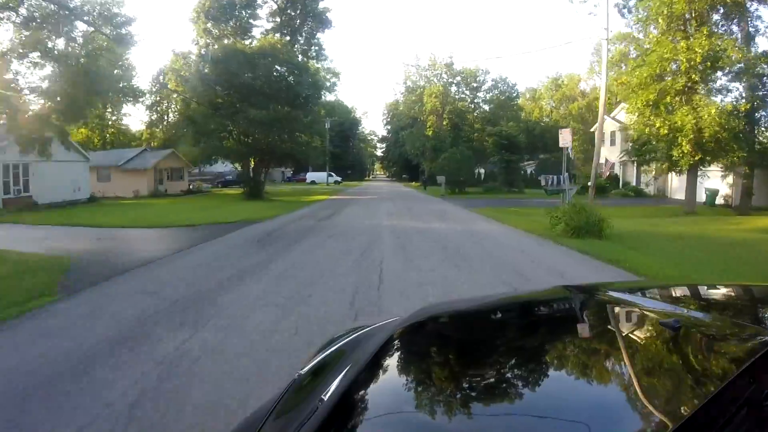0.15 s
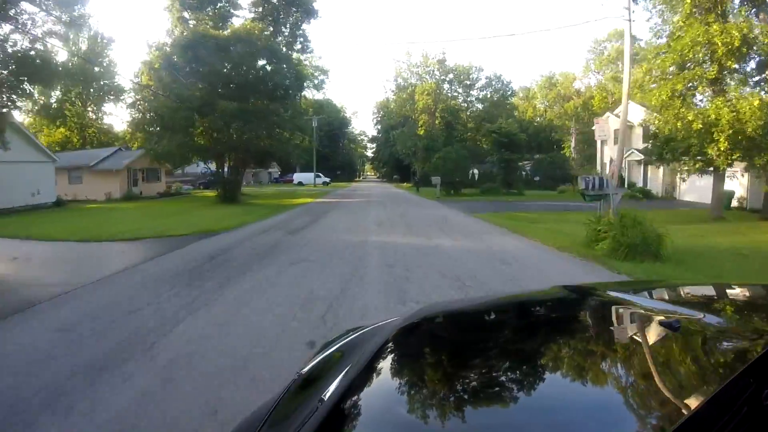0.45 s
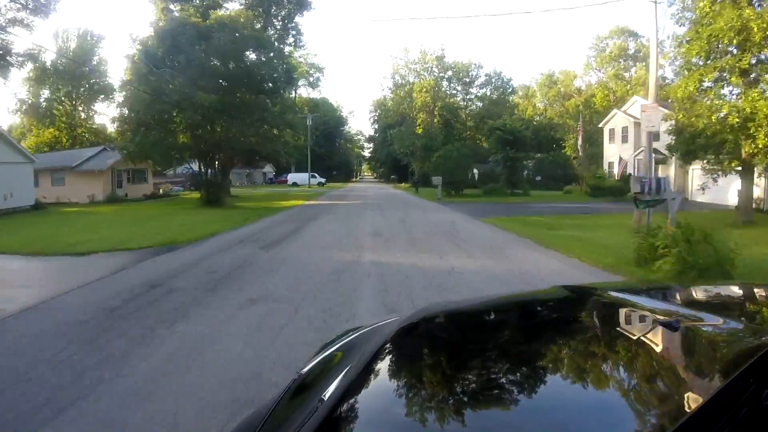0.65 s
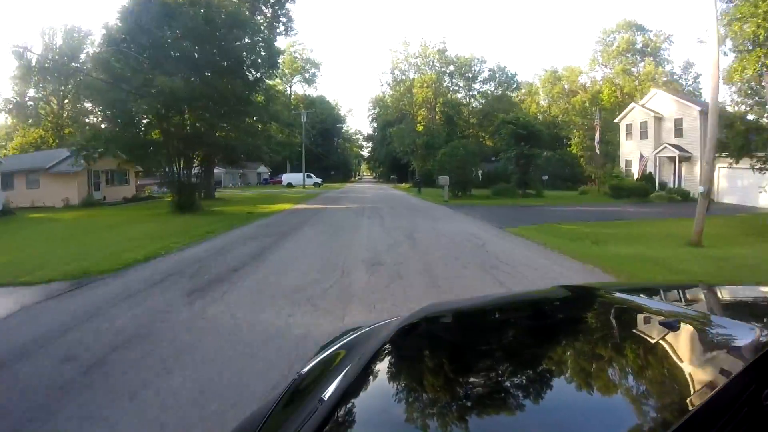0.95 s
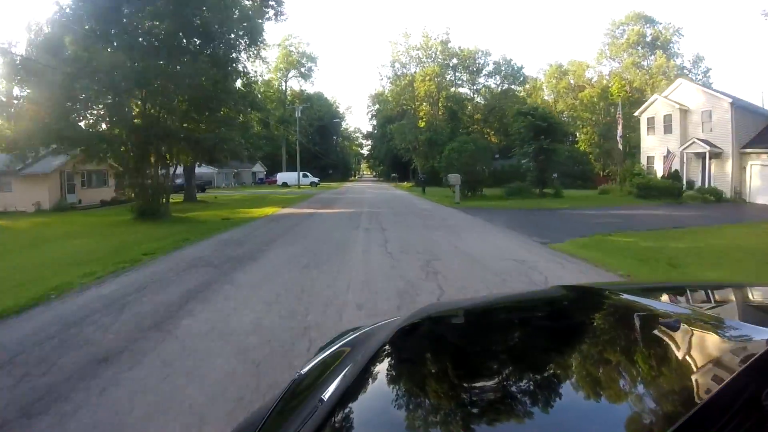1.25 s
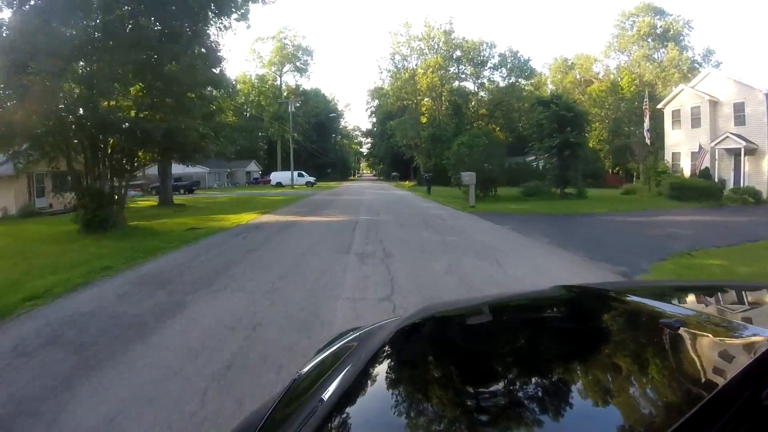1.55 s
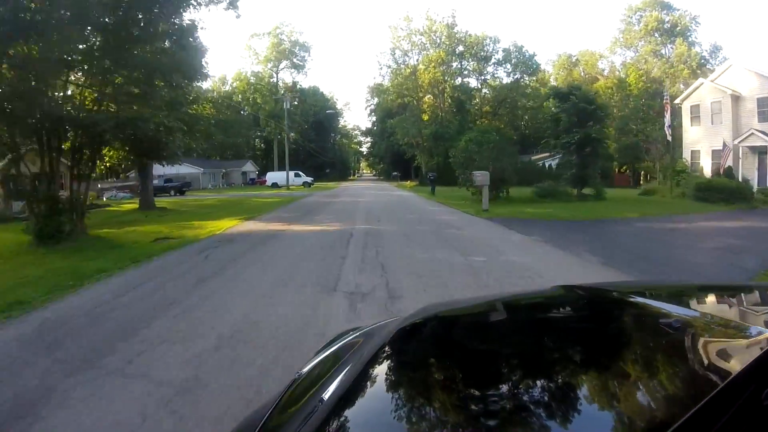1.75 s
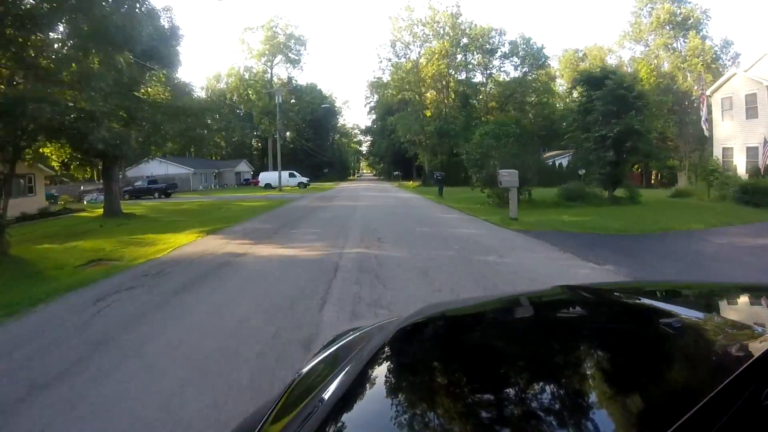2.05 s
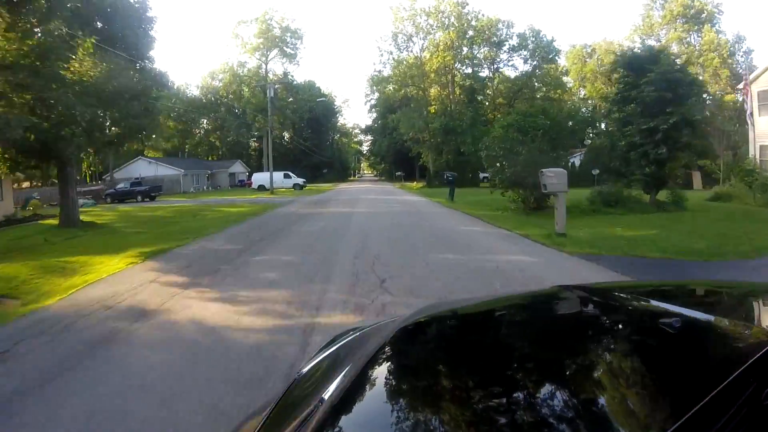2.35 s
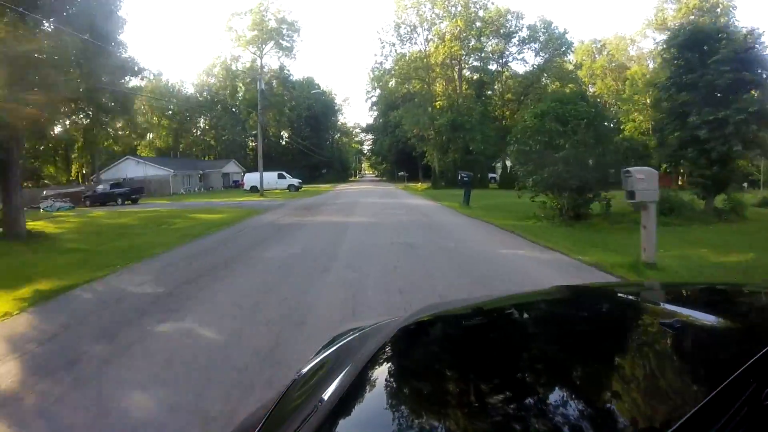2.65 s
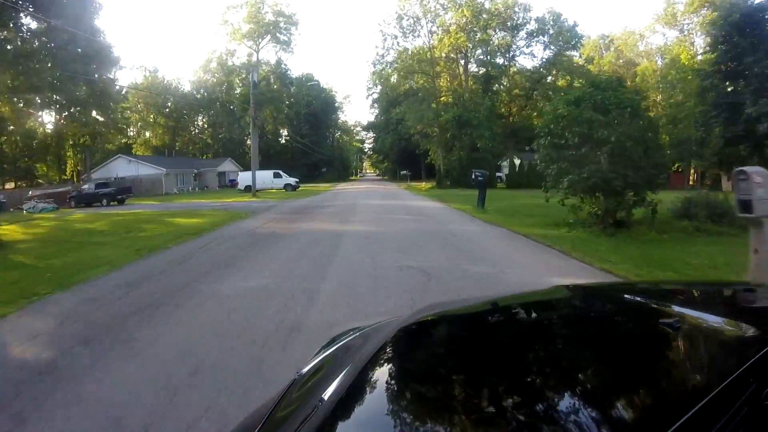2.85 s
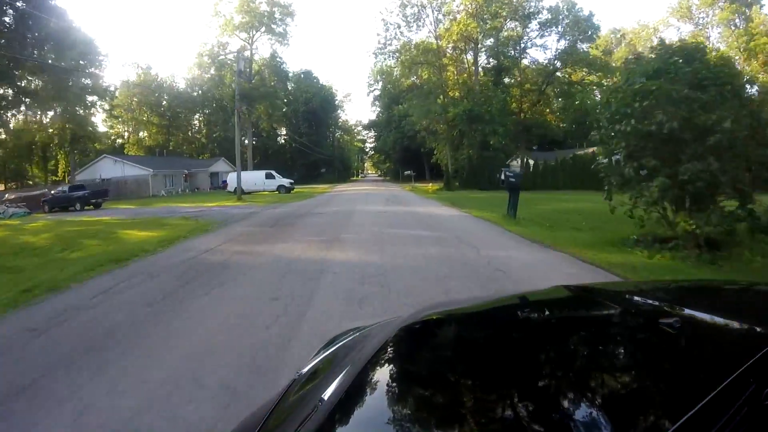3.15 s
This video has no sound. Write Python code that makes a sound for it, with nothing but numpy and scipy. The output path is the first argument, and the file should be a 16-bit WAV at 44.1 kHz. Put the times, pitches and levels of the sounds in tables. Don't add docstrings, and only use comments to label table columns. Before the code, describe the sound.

A car engine roars under hard acceleration, cuts with a valve flutter, then drives on quieter.

```python
import sys
import numpy as np
from scipy import signal
from scipy.fft import rfft, irfft
from scipy.io import wavfile
from scipy.ndimage import uniform_filter1d

SR = 44100
rng = np.random.default_rng(int(sys.argv[2]) if len(sys.argv) > 2 else 0)


def convert_level_to_amplitude(level_db):
    exponent = np.asarray(level_db, float) / 20
    return 10 ** exponent


def inscribe(sig):
    pcm = np.round(np.clip(np.atleast_2d(sig).T, -1, 1) * 32767)
    wavfile.write(sys.argv[1], SR, pcm.astype(np.int16))


N = 145089

# (time [s], firing rate [Hz], firing level [dB], intake roar [dB])
ENGINE_RUN = [(0, 77.7, -18, -41.5), (.1, 80.2, -17, -32), (.26, 84.9, -17, -24), (.45, 90.6, -16, -21),
              (.74, 98.4, -18, -18.5), (1.13, 104.5, -22, -19), (1.2, 105, -30, -23.5),
              (1.34, 105, -30, -26), (1.46, 104.5, -21, -32.5), (2.15, 105, -18, -32.5),
              (2.42, 101.1, -23, -38), (2.52, 93, -21, -37.5), (2.62, 79, -18, -38), (2.76, 69, -15.5, -39),
              (2.9, 63.8, -15.5, -40), (3.05, 68.35, -24, -39.5), (3.17, 64.27, -21, -48),
              (3.29, 66.9, -16, -41.5)]
# (time [s], state [1])
DRIVE_STATE = [(.15, 0), (.45, 1), (.75, 1.25), (1.12, 1.3), (1.2, 2), (1.34, 2), (1.42, 3), (2.6, 3),
               (2.78, 3.3), (2.92, 3.3), (3.03, 4), (3.14, 4), (3.175, 3.6), (3.21, 3.95), (3.29, 3.85)]
# (multiple of firing rate [1], level in states 0 to 4 [dB] x 5)
FIRING_ORDERS = [(.5, -20, -18, -10, -15, -12), (1, 0, 0, 0, 0, 0), (1.5, -20, -16, -10, -16, -12),
                 (2, -1, -8, -5, -13, 11), (3, -15, -9, -2, -26, 1), (4, -14, -10, -24, -26, -20),
                 (4.5, -15, -20, -14, -28, -20), (5, -20, -20, -14, -34, -4)]
# (frequency [Hz], width [Hz], level [dB])
INTAKE_PEAKS = [(433.7, 49, -1), (686, 43.7, 0.5), (1033.4, 33, -6), (1157, 35, -4.5), (1256, 34.5, -1),
                (1491, 29.4, -1), (1655, 36, 0.5), (1752, 167, -1), (1977, 205, -1), (2078.5, 54, 2.5),
                (2230, 50, -16), (2624, 80, -21.5)]
# (frequency [Hz], density [dB/Hz])
ROAD_COLOUR = [(12, -24.5), (22, -19), (109, -2), (269, -11.5), (690, -20), (890, -31.5), (2000, -36.5),
               (3500, -44.5)]
# (time [s], level [dB])
ROAD_COURSE = [(0, -27), (.5, -24), (.9, -21), (1.17, -20), (1.25, -23), (1.33, -29), (1.42, -25.5),
               (1.6, -23), (2.2, -20), (2.6, -21.5), (3.0, -22), (3.29, -25)]
# (time [s], level [dB])
TURBO_AIR = [(0, -41.5), (.08, -39.5), (.3, -36), (.65, -31.5), (1.14, -32.5), (1.19, -37), (1.234, -41.5),
             (1.295, -38), (1.33, -43.5), (1.37, -38), (1.4, -43), (1.415, -39.5), (1.55, -40), (2.1, -39),
             (2.45, -45), (3.04, -47.5), (3.07, -54), (3.12, -48.5)]
# (frequency [Hz], density [dB/Hz])
HISS_COLOUR = [(1500, -14.5), (2300, 1.5), (3000, -13), (5300, -12), (7000, -19), (9000, -26), (10300, -32),
               (15000, -47.5)]
# (frequency [Hz], width [Hz], level [dB])
DUCT_PEAKS = [(3158, 23, 2.5), (3398, 45, 3), (3706, 16, 5), (4066, 84, 0.5), (4505, 75, -1.5),
              (5140, 140, -12), (5980, 33, -4), (6515, 120, -6), (8550, 260, -8), (9380, 120, -39)]
# (time [s], frequency [Hz], level [dB])
AIR_RUSH = [(0, 4300, -62), (.08, 4600, -51), (.2, 5200, -47), (.6, 5220, -44), (1.15, 5230, -46),
            (1.25, 5230, -52), (1.55, 5240, -50), (1.7, 5200, -65)]
# (time [s], frequency [Hz], level [dB])
SPOOL_UP = [(.12, 1470, -50), (.17, 1490, -36), (.25, 1470, -34), (.3, 1480, -24), (.335, 1490, -34),
            (.365, 1580, -29), (.39, 1680, -24), (.43, 1980, -25), (.47, 2070, -30), (.52, 2090, -70)]
# (time [s], frequency [Hz], level [dB])
WHEEL_WHISTLE = [(.35, 7900, -75), (.5, 8250, -55), (.65, 8700, -52), (.8, 8930, -50), (.95, 8780, -51),
                 (1.1, 8400, -51), (1.205, 8100, -51), (1.22, 8050, -75)]
# (centre time [s], peak [dB], pitch [Hz], half length [s])
DUCT_TONES = [
    (.385, -27, 1680, 0.042),
    (.44, -21.5, 1470, 0.018),
    (0.58, -28, 1240, 0.036),
    (0.51, -23, 1485, 0.09),
    (0.64, -23, 2085, 0.067),
    (0.82, -18.5, 2050, 0.014),
    (.625, -24, 1760, 0.033),
    (2.76, -41, 3200, 0.033),
]
# (centre time [s], peak [dB], pitch [Hz], half length [s])
VALVE_FLUTTER = [(.83, -17, 366, 0.025), (.895, -16.5, 447, 0.032), (1.045, -19.5, 365, 0.039),
                 (.922, -10, 429, 0.029), (.99, -17, 354, 0.04), (1.058, -19, 423, .01),
                 (1.06, -22, 696, 0.022), (1.088, -11, 433, 0.028), (1.115, -13.5, 427, 0.017),
                 (1.12, -24, 700, 0.021), (.965, -15.5, 410, 0.02), (1.385, -25.5, 677, .025),
                 (1.45, -28.5, 698, 0.035), (1.15, -7.5, 400, 0.0088), (1.189, -6.5, 439, 0.022),
                 (1.214, -2.5, 431, 0.02), (1.252, -14, 440, 0.028), (1.274, -11, 487, 0.0082),
                 (1.29, -8, 410, 0.0079), (1.304, -3.5, 435, 0.0048), (1.319, -11.5, 436, 0.016),
                 (1.365, -13, 425, 0.0076), (1.403, -9.5, 422, 0.012), (1.423, -17.5, 446, 0.022)]
# (centre time [s], peak [dB], pitch [Hz], half length [s])
BODY_BUMPS = [(.865, -8.5, 80, 0.044), (2.1, -26, 315, 0.11), (2.186, -2.5, 104, .012),
              (2.222, -5.5, 119, 0.014), (2.264, -2, 114.6, 0.012), (2.291, -7.5, 124, 0.031),
              (2.312, -11, 130, 0.011), (2.384, -5, 128, 0.014), (2.4, -5, 112, 0.012),
              (2.468, -4, 120, 0.016), (2.519, -11.5, 120.3, 0.0065)]
# (time [s], frequency [Hz], level [dB])
VENT_PUFFS = [(1.15, 7000, -68), (1.21, 7000, -54), (1.295, 7500, -53), (1.33, 7000, -61),
              (1.37, 7540, -45.5), (1.4, 7000, -58), (1.42, 6780, -47), (1.55, 6500, -53), (1.7, 6510, -72)]
# (time [s], frequency [Hz], level [dB])
THROTTLE_HISS = [(1.2, 2080, -50), (1.45, 2080, -35), (2.6, 2100, -39), (3.05, 2120, -36),
                 (3.062, 2120, -60)]
# (time [s], frequency [Hz], level [dB])
SEAL_LEAK = [(1.3, 3750, -62), (1.45, 3750, -47), (1.8, 3750, -50), (2.1, 3750, -43), (2.42, 3750, -46),
             (2.55, 3750, -55), (2.9, 3750, -58), (3.05, 3750, -70)]
# (time [s], frequency [Hz], level [dB])
THIN_LEAK = [(1.3, 6750, -70), (1.6, 6750, -62), (1.9, 6720, -57), (2.15, 6700, -50), (2.45, 6680, -56),
             (2.7, 6670, -63), (2.9, 6670, -80)]
# (time [s], frequency [Hz], level [dB])
SPIN_DOWN = [(1.62, 5400, -65), (1.7, 5300, -47), (1.8, 5000, -56), (1.95, 4480, -50), (2.05, 4200, -41),
             (2.15, 4080, -46), (2.35, 4050, -48), (2.5, 4000, -62)]
# (time [s], frequency [Hz], level [dB])
BODY_BOOM = [(2.0, 140, -40), (2.22, 143, -24), (2.4, 140, -20), (2.52, 141, -23), (2.63, 140, -19),
             (2.74, 138, -24), (2.82, 131, -44)]

WAVER_DB, WOBBLE_SHARE = 1.6, 0.006
THROB_SHARE, THROB_DECAY_CYCLES = 0.29, 0.67
DUCT_DB = -4.5
WIND_HZ, WIND_DB, GUST_DB = 57, -3.5, 0.8
DUCK_ABOVE_DB, DUCK_SHARE, RECOVER_DB_PER_S = -9, 0.45, 61


def evened(x):
    return x / np.sqrt(np.mean(x ** 2) + 1e-20)


def curve(table, index):
    rows = np.array(table, float)
    return np.interp(np.arange(N) / SR, rows[:, 0], rows[:, index])


def drift(top_hz):
    spectrum = rfft(rng.standard_normal(N))
    hz = np.fft.rfftfreq(N, 1 / SR)
    return evened(irfft(spectrum / (1 + (hz / top_hz) ** 4), N))


def coloured(points, patchy_db):
    frames, hz = N // 256 + 5, np.fft.rfftfreq(1024, 1 / SR)
    real, imag, patches = rng.standard_normal((frames, 513, 3)).T
    patches = uniform_filter1d(patches, size=10, axis=0)
    patches = evened(uniform_filter1d(patches, size=12, axis=1))
    points_hz, points_db = np.transpose(points)
    shape_db = np.interp(np.log(hz + 1), np.log(points_hz + 1), points_db, right=-120)[:, None]
    cells = (real + 1j * imag) * convert_level_to_amplitude(shape_db + patchy_db * patches)
    return evened(signal.istft(cells, nperseg=1024, noverlap=768)[1][:N])


def ring(x, peaks, top_hz):
    hz = np.fft.rfftfreq(N, 1 / SR)
    gain = np.zeros(len(hz), complex)
    for k, (peak_hz, width_hz, db) in enumerate(peaks):
        detune_hz = hz - peak_hz * peak_hz / (hz + 1)
        gain += (-1) ** k * convert_level_to_amplitude(db) / (1 + 1j * detune_hz / width_hz)
    return evened(irfft(rfft(x) * gain / (1 + (hz / top_hz) ** 6), N))


def whistle(table, width_hz, fuzz):
    turn = np.exp(2j * np.pi * np.cumsum(curve(table, index=1)) / SR)
    noise = (drift(width_hz) + 1j * drift(width_hz)) / np.sqrt(2)
    sway = 1 - fuzz + fuzz * noise
    return np.sqrt(2) * convert_level_to_amplitude(curve(table, index=2)) * (turn * sway).real


def bursts(table, rough):
    t, out = np.arange(N) / SR, np.zeros(N)
    for centre_s, db, hz, half_s in table:
        u = np.clip((t - centre_s) / half_s, -1, 1)
        swell = np.cos(np.pi * u / 2) ** 2
        out += convert_level_to_amplitude(db) * swell * np.cos(2 * np.pi * hz * (t - centre_s))
    return out * (1 + rough * drift(top_hz=150))


def firing_count():
    rate_hz = curve(ENGINE_RUN, index=1) * (1 + WOBBLE_SHARE * drift(top_hz=23.7))
    return np.cumsum(rate_hz) / SR


def engine(fired):
    state, out = curve(DRIVE_STATE, index=1), np.zeros(N)
    for order, *mix_db in FIRING_ORDERS:
        level_db = np.interp(state, np.arange(len(mix_db)), mix_db) + WAVER_DB * drift(top_hz=7.5)
        out += convert_level_to_amplitude(level_db) * np.cos(2 * np.pi * order * (fired + 0.3464))
    return np.sqrt(2) * convert_level_to_amplitude(curve(ENGINE_RUN, index=2)) * out


def intake(fired):
    pulse = np.exp(-(fired % 1) / THROB_DECAY_CYCLES)
    gulps = 1 + THROB_SHARE * evened(pulse - THROB_DECAY_CYCLES)
    roar = ring(gulps * rng.standard_normal(N), INTAKE_PEAKS, top_hz=3550)
    return convert_level_to_amplitude(curve(ENGINE_RUN, index=3) + 1.1 * drift(top_hz=54)) * roar


def road():
    course_db = curve(ROAD_COURSE, index=1)
    wind = convert_level_to_amplitude(WIND_DB + course_db + GUST_DB * drift(top_hz=21)) * drift(WIND_HZ)
    tyres = convert_level_to_amplitude(course_db + 0.7 * drift(top_hz=14.3)) * coloured(ROAD_COLOUR, patchy_db=0.0)
    return tyres + wind


def turbo_air():
    level = convert_level_to_amplitude(curve(TURBO_AIR, index=1) + 0.38 * drift(top_hz=6.3))
    hiss = coloured(HISS_COLOUR, patchy_db=1.5)
    ducts = ring(rng.standard_normal(N), DUCT_PEAKS, top_hz=8500)
    air = evened(hiss + convert_level_to_amplitude(DUCT_DB) * ducts)
    return level * air + whistle(AIR_RUSH, width_hz=200, fuzz=0.98)


def turbo_whistle():
    return whistle(SPOOL_UP, width_hz=8, fuzz=0.2) + whistle(WHEEL_WHISTLE, width_hz=20, fuzz=0.25)


def duct_tones():
    return bursts(DUCT_TONES, rough=0.2)


def valve_flutter():
    return bursts(VALVE_FLUTTER, rough=0.1)


def bumps():
    return bursts(BODY_BUMPS, rough=0.15)


def vent():
    return whistle(VENT_PUFFS, width_hz=1800, fuzz=0.86)


def closed_throttle():
    return whistle(THROTTLE_HISS, width_hz=204, fuzz=0.81)


def leaks_and_spin_down():
    seal = whistle(SEAL_LEAK, width_hz=79, fuzz=1.0)
    thin = whistle(THIN_LEAK, width_hz=60, fuzz=0.8)
    return seal + thin + whistle(SPIN_DOWN, width_hz=100, fuzz=0.92)


def body_boom():
    return whistle(BODY_BOOM, width_hz=8, fuzz=0.3)


def scene():
    fired = firing_count()
    mix = engine(fired) + intake(fired) + road() + turbo_air()
    mix += turbo_whistle() + duct_tones() + valve_flutter() + bumps()
    mix += vent() + closed_throttle() + leaks_and_spin_down() + body_boom()
    return mix[None]


def low_pass(x):
    return signal.sosfilt(signal.butter(12, 15100, fs=SR, output="sos"), x)


def record(dry):
    x = signal.sosfilt(signal.butter(2, 18, "high", fs=SR, output="sos"), dry)
    power_db = 10 * np.log10(abs(uniform_filter1d(x[0] ** 2, size=900)) + 1e-12)
    fall_db = np.arange(N) * RECOVER_DB_PER_S / SR
    held_db = np.maximum.accumulate(power_db + fall_db) - fall_db
    over_db = np.maximum(held_db - DUCK_ABOVE_DB, 0)
    x = x / convert_level_to_amplitude(DUCK_SHARE * uniform_filter1d(over_db, size=300))
    return low_pass(1.104 * np.tanh(x / 1.057))


dry = scene()
out = record(dry)
inscribe(out)
```